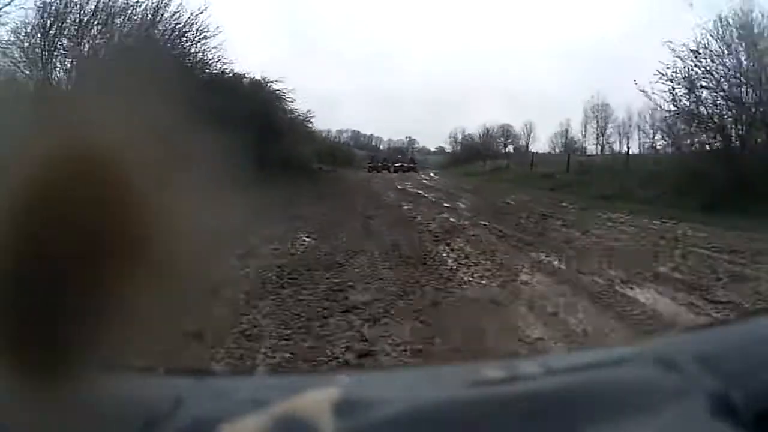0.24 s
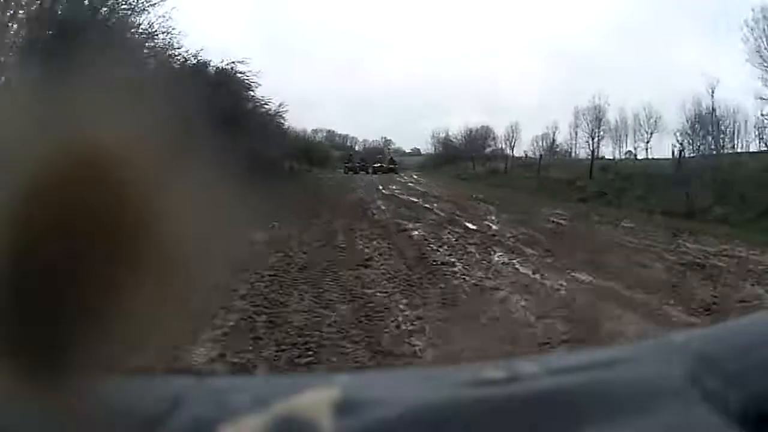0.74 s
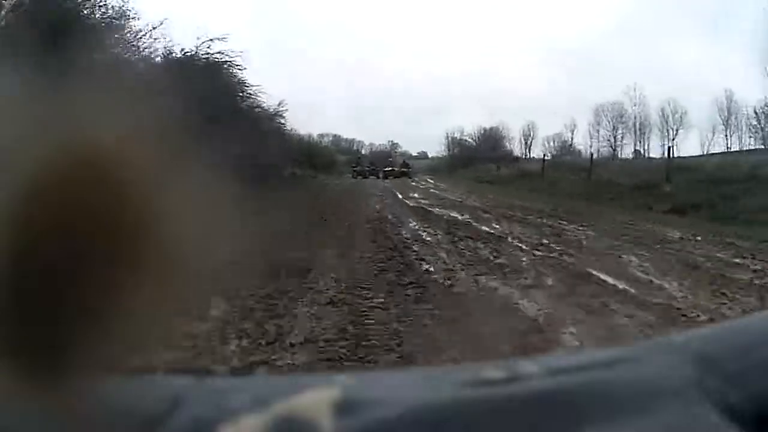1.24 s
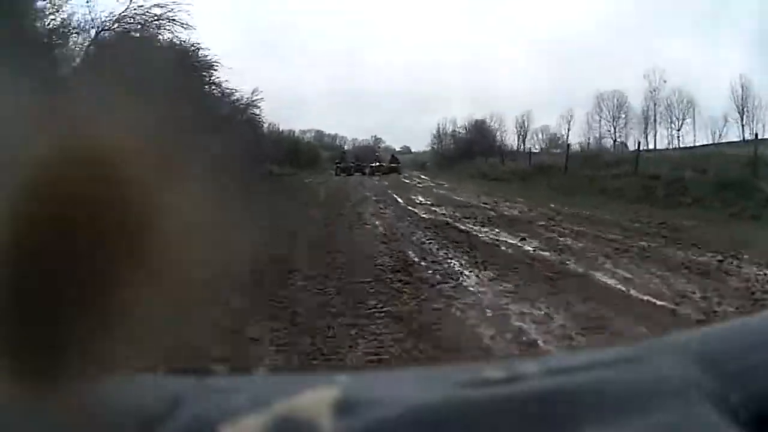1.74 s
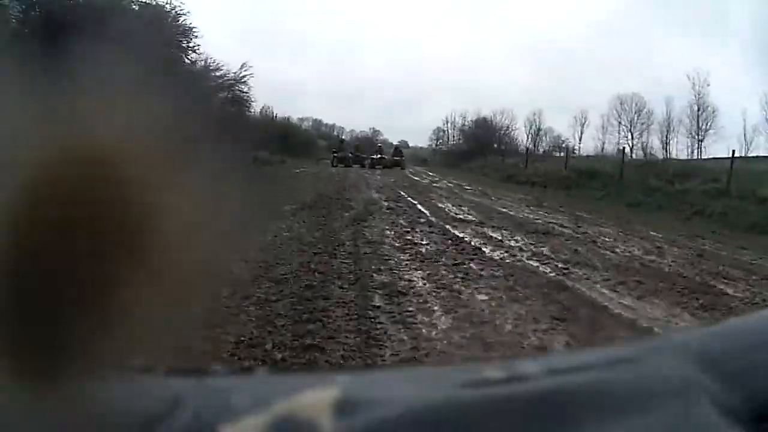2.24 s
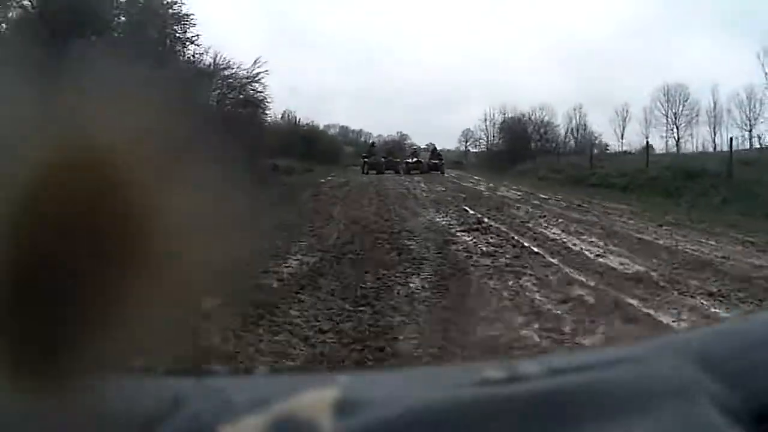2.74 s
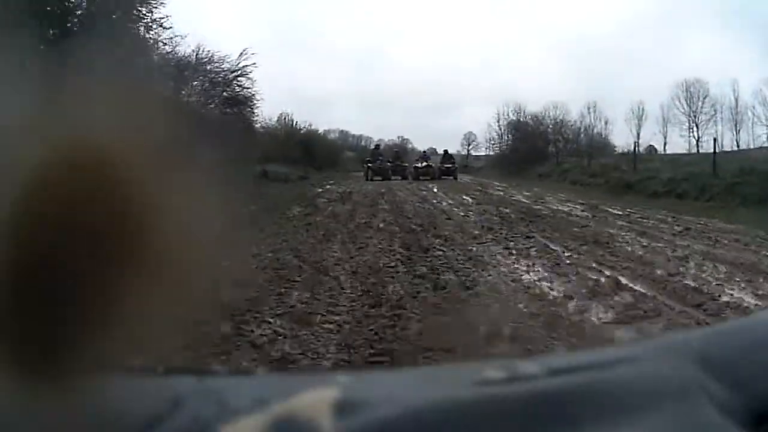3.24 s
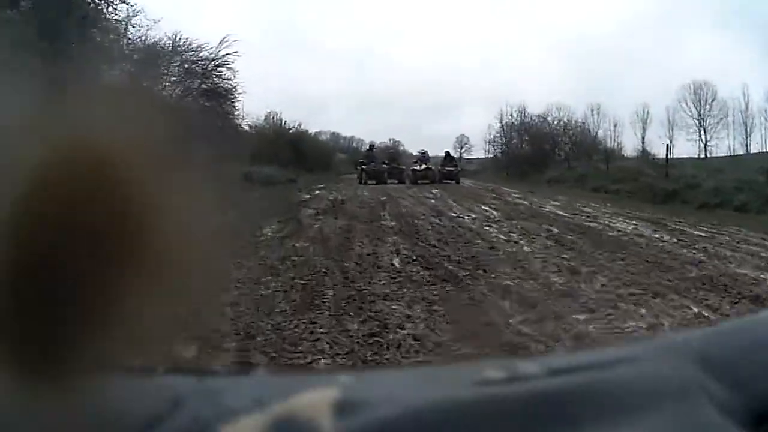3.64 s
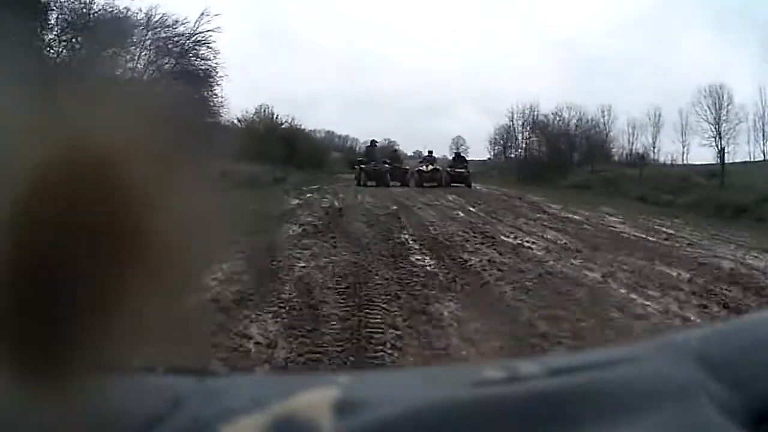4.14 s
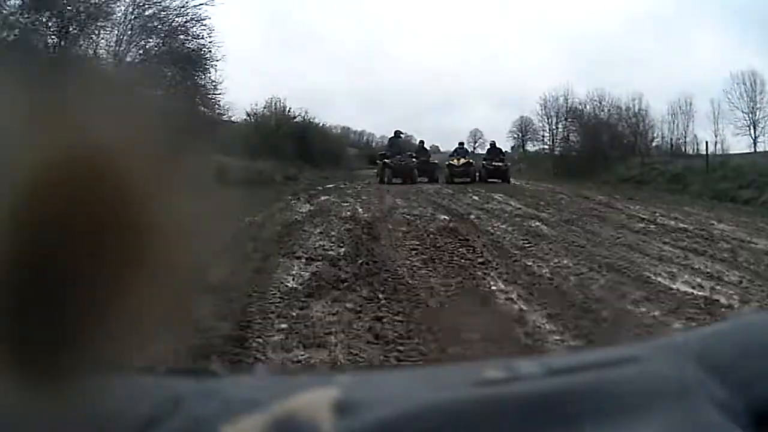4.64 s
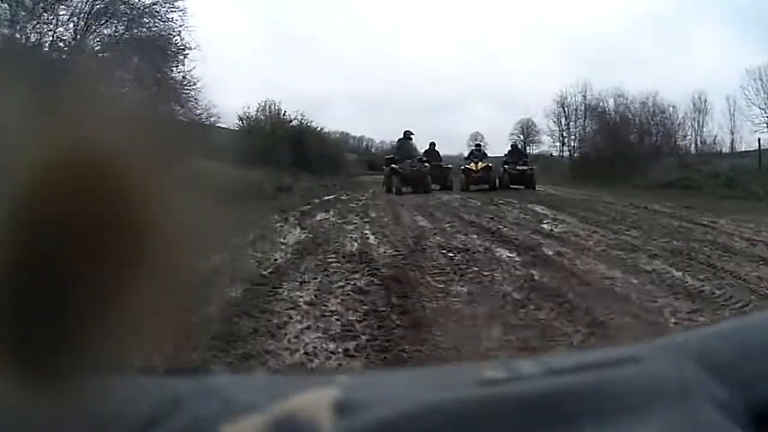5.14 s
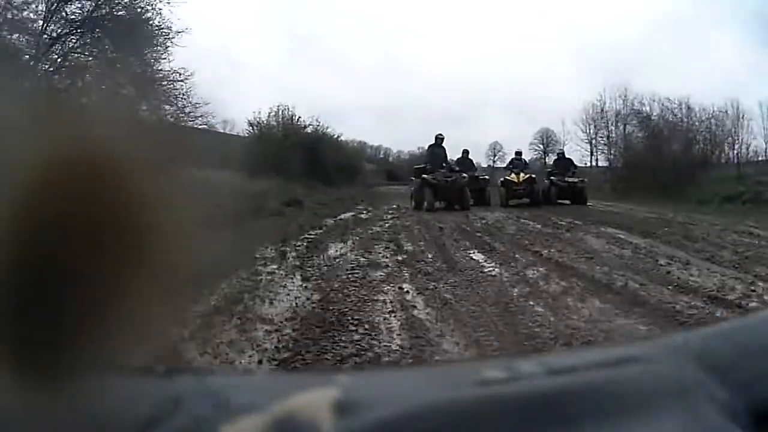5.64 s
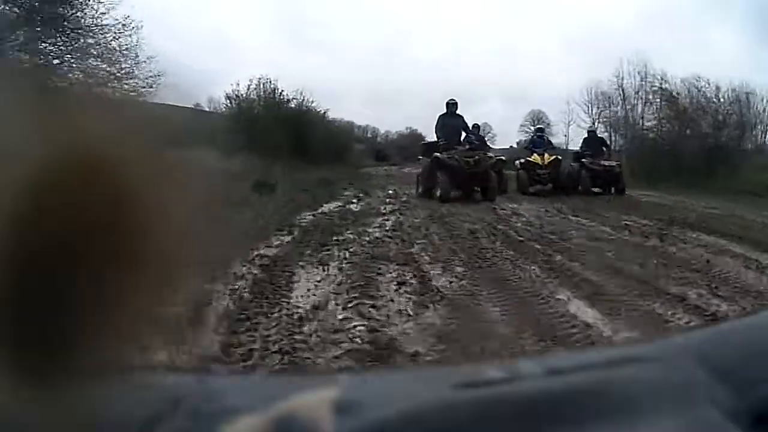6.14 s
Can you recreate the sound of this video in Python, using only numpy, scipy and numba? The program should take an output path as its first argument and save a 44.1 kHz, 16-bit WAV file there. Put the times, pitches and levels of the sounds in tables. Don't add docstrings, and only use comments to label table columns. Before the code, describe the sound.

Outdoors on a muddy track, a quad bike engine putters close by, its vibration passing through the frame to an enclosed microphone. A loose bar hums waveringly while the rack buzzes. Early throttle and dense knocks lead to a double low thud, then the engine slows and calms. Small wet spatters tick, two brief revs rise, and it settles again with a few last bumps.

```python
import sys
import numpy as np
from scipy import signal
from scipy.fft import rfft, irfft
from scipy.io import wavfile
from scipy.ndimage import uniform_filter1d
from numba import njit

SR = 44100
rng = np.random.default_rng(int(sys.argv[2]) if len(sys.argv) > 2 else 0)


def transcribe(u):
    v = np.clip(np.atleast_2d(u).T, -1, 1)
    q = np.round(v * 32767).astype(np.int16)
    wavfile.write(sys.argv[1], SR, q)


def attenuation_scalar(level_db):
    decades = np.asarray(level_db, float) / 20
    return 10 ** decades


N = 281799

# pitch in Hz, level in dB below the leading mode.
MOUNT_MODES = [(370, -3.5), (590, -7), (735, -7), (1150, -6), (1300, -14), (1450, -11.5), (1650, -12),
               (1820, -17), (2050, -20)]
# start in s, high modes in dB, low modes in dB, low pitch in Hz.
BUMPS = [(.1516, -38, -34, 710), (.203, -37, -34, 866), (.5103, -31, -27, 827), (.6403, -37.5, -29.5, 603),
         (1.1224, -28, -39, 623), (1.262, -37, -30, 820), (1.4985, -24.5, -28, 880),
         (1.6206, -27, -33, 589), (1.722, -33, -40, 870), (1.8003, -42, -31, 774),
         (1.9361, -30, -28.5, 589), (2.1226, -30, -23.5, 700), (2.2027, -30, -30, 614),
         (2.544, -42, -32, 766), (2.7797, -36.5, -52, 810), (2.8247, -28, -35, 735),
         (2.9103, -45, -33, 576), (3.048, -37, -36, 640), (3.1335, -38, -37, 616), (3.4485, -39, -35, 785),
         (3.6248, -48, -32, 724), (3.7445, -33, -34, 750), (3.8863, -42, -34.5, 830),
         (4.0212, -37, -31.5, 650), (4.2817, -36.5, -35, 720), (4.374, -39, -35.5, 620),
         (5.9507, -41, -35, 825), (6.0145, -36, -30, 735), (6.178, -33, -33, 704),
         (6.3068, -47, -38.5, 600)]


def level(x, db):
    return x * attenuation_scalar(db) / np.sqrt(np.mean(x ** 2))


def curves(table):
    s, *columns = np.transpose(table)
    return [np.interp(np.arange(N) / SR, s, c) for c in columns]


@njit
def svf(x, hz, width):
    y, band, low = np.empty(len(x)), 0., 0.
    g, damping = np.tan(np.pi * hz / SR), width / hz
    for i in range(len(x)):
        v = (band + g * (x[i] - low)) / (1 + g * (g + damping))
        band = 2 * v - band
        low += 2 * g * v
        y[i] = damping * v
    return y


def resonance(x, hz, width):
    return svf(svf(x, float(hz), float(width)), float(hz), float(width))


def ring(x, modes):
    out = np.zeros(len(x))
    for k, (hz, width, db) in enumerate(modes):
        out += (-1) ** k * level(resonance(x, hz, 1.53 * width), db)
    return level(out, 0)


def coloured(points):
    hz, db = np.transpose(points)
    log_hz = np.log(np.arange(N // 2 + 1) * SR / N + 1)
    spectrum = rfft(rng.standard_normal(N)) * attenuation_scalar(np.interp(log_hz, np.log(hz), db))
    return level(irfft(spectrum, N), 0)


def walk(rate):
    hold = int(SR / rate)
    steps = np.repeat(rng.standard_normal(N // hold + 1), hold)
    return 1.268 * uniform_filter1d(uniform_filter1d(steps, hold), hold)[:N]


def burst(start, rise, fall):
    i = int(start * SR)
    fall = max(fall, .001)
    t = np.arange(min(int(8 * fall * SR), N - i)) / SR
    return i, np.minimum(t / max(rise, .0002), 1) * np.exp(-t / fall)


def hiss():
    # pitch in Hz, level in dB per Hz.
    hiss_spectrum = [(2500, -34), (4800, -1), (6500, -2), (9000, -5), (12000, -2), (15000, -6.5),
                     (15300, -7), (15700, -19)]
    return coloured(hiss_spectrum) * attenuation_scalar(-64.5)


def orders(hz, firing_db):
    # pitch in Hz, level in dB.
    frame_response = [(37, -33), (42, -38.5), (46.5, -40), (52, -33), (60, -28), (76, -37.5), (94, -35),
                      (118, -52)]
    # start in s, end in s, change of piston shake in dB.
    slack_spans = [
        (1.95, 2.754, -5),
        (3.28, 3.72, -9.5),
    ]
    frame_hz, frame_db = np.transpose(frame_response)

    def frame(f):
        return np.interp(np.log(f), np.log(frame_hz), frame_db)

    t = np.arange(N) / SR
    slack_db = np.zeros(N)
    for start, end, db in slack_spans:
        slack_db += db * np.clip(np.minimum(t - start, end - t) / 0.09 + .5, 0, 1)
    load = firing_db + 42
    crank_db = frame(2 * hz) + 0.28 * load
    third_db = -31.5 + 0.72 * load + 0.4 * (frame(3 * hz) + 35)
    piston_db = frame(4 * hz) + slack_db
    return [firing_db, crank_db, third_db, piston_db]


def thrum(hz, cycles, order_db):
    # multiple of the firing rate, level in dB below piston shake.
    upper_orders = [(5, -16.5), (6, -10), (7, -18), (8, -16)]
    firing_db, _, _, piston_db = order_db
    order_db = list(order_db)
    for k, db in upper_orders:
        muffled_db = piston_db + db - 0.59 * np.maximum(k * hz - 120, 0)
        order_db.append(np.maximum(muffled_db, firing_db - 16))
    lag = [0.237 * k * (k - 1) for k in range(len(order_db))]
    lag[2] = lag[2] * np.tanh((firing_db + 53) / 3)
    slip, wobble_db = .06, .9
    out = np.zeros(N)
    for k, db in enumerate(order_db):
        size = attenuation_scalar(db + 0.43 + wobble_db * walk(14))
        out += size * np.cos(2 * np.pi * (k + 1) * cycles - lag[k] + slip * walk(14))
    return -np.sqrt(2) * out


def strokes(cycles, idle_db, scatter_db):
    turn = np.floor(2 * cycles).astype(int)
    scatter = scatter_db * rng.standard_normal(turn[-1] + 1)[turn]
    size = attenuation_scalar(scatter + np.minimum(idle_db - 0.5, 0) * (turn % 2))
    decay_turns = .7
    blows = level(np.diff(turn, prepend=0) * size, 0)
    return blows, size * np.exp(-(2 * cycles - turn) / decay_turns)


def shaken(cycles, firing_db, rattle_db):
    # pitch in Hz, width in Hz, level in dB.
    rack_modes = [(223, 10, -20), (292.7, 52, -4.5), (317, 22, -3.5), (336, 15, -0.5), (366, 17, -3),
                  (392, 20.3, -3.5), (426, 6.4, -14), (452, 20, -9)]
    panel_modes = [(538, 18, -21.5), (594, 69, -6.5), (653, 42, -4), (735, 57, -7.5), (805, 53, 5),
                   (827.4, 70, 0), (869, 22, -4), (924, 52, -7.5), (1033, 43, -12), (1136, 50, -14.5)]
    case_modes = [(1378, 64, -11.5), (1488, 27, -16), (1600, 25, -14), (1834, 29, -14.5), (1895, 21, -12),
                  (1926, 40, -20), (2168, 37, -19), (2867, 420, -7), (3339, 195, -10), (3863, 297, 1),
                  (4490, 170, -21), (7100, 1360, -18.5), (10300, 1900, -22.5), (14800, 900, -27)]
    # pitch in Hz, level in dB per Hz.
    rumble_spectrum = [(25, -18), (60, 1.5), (110, -0.5), (160, -9), (500, -21.5), (1200, -29.5),
                       (2500, -32), (5000, -98)]
    rack_db = -41 + 1.05 * (rattle_db + 44)
    case_db = -51 + 0.8963 * (rattle_db + 44)
    idle_db = -0.43 * (firing_db + 60.5)
    blows, gate = strokes(cycles, idle_db, scatter_db=2.5)
    chatter = [level((gate + steady) * rng.standard_normal(N), 0) for steady in (.8, .8, .7)]
    rack = ring(.9 * blows + chatter[0], rack_modes) * attenuation_scalar(rack_db - 1.5 + 1.4 * walk(9))
    panel = ring(.6 * blows + chatter[1], panel_modes) * attenuation_scalar(rattle_db - 1.05 + 0.71 * walk(12))
    case = ring(0.061 * blows + chatter[2], case_modes)
    case *= attenuation_scalar(case_db - 0.1 + 1.2 * walk(20) + 0.58 * walk(45))
    patchy_db = .8
    ground = coloured(rumble_spectrum) * attenuation_scalar(0.71 * (rattle_db + 45.0) - 41.5 + patchy_db * walk(4.92))
    return rack + panel + case + ground


def singing(cycles):
    # start in s, end in s, first pitch in Hz, last pitch in Hz, level in dB.
    bar_tones = [(0.035, 0.44, 330, 343.8, -36.5), (0.41, 0.698, 334, 322.7, -38),
                 (0.693, 1.295, 338, 327, -45), (1.306, 1.655, 327.5, 349.6, -35.5),
                 (1.662, 1.947, 373, 366, -45.5), (1.897, 2.075, 338.7, 343, -41.5),
                 (2.128, 2.405, 385, 377, -45.5), (2.378, 2.917, 375.4, 348, -41.5),
                 (2.854, 3.106, 392, 378, -45.5), (3.508, 3.896, 348, 339.6, -48.5),
                 (4.252, 4.503, 428, 426, -50.5), (4.722, 5.077, 392, 395, -48),
                 (5.079, 5.426, 422, 426, -42.5), (5.077, 5.396, 336, 342, -45),
                 (5.481, 5.915, 426, 434.6, -42.5), (5.601, 6.038, 336, 336, -44.5),
                 (6.102, 6.39, 420, 426, -44.5), (5.056, 5.497, 1353, 1396, -66),
                 (5.2, 5.945, 1912, 1900, -64)]
    out, waver, swell = np.zeros(N), walk(30), walk(16)
    throb = 3 * np.cos(2 * np.pi * cycles)
    for start, end, first_hz, last_hz, db in bar_tones:
        a, b = int(start * SR), min(int(end * SR), N)
        hz = np.linspace(first_hz, last_hz, b - a) * (1 + 0.0036 * waver[a:b])
        loudness = attenuation_scalar(db - 0.5 + 1.7 * swell[a:b] + throb[a:b]) * np.hanning(b - a) ** 0.2
        out[a:b] += np.sqrt(2) * loudness * np.sin(2 * np.pi * np.cumsum(hz) / SR)
    return out


def knocks():
    # start in s, high modes in dB, low modes in dB, low pitch in Hz.
    taps = [
        (.078, -43, -39, 740),
        (.7924, -39, -45, 740),
        (1.5454, -39, -36, 820),
        (2.3858, -38, -51, 805),
        (2.4254, -37, -46, 810),
        (2.663, -40, -38, 743),
        (3.5454, -42, -37.5, 780),
        (4.5467, -46, -42, 620),
        (4.8598, -48, -41, 692),
        (6.0893, -44, -40, 614),
    ]
    out, t = np.zeros(N), np.arange(int(.06 * SR)) / SR
    rise, tail, ring_s = .006, 1.15, .16
    bumps = BUMPS + taps
    chance = rng.standard_normal((len(bumps), len(MOUNT_MODES) + 2, 3))
    swell = np.sin(np.pi / 2 * np.minimum(t / rise, 1)) ** 2
    for (s, high_db, low_db, low_hz), own in zip(bumps, chance):
        modes = [(low_hz, low_db), (1108, high_db - 11.0)]
        modes += [(hz, db + (low_db if hz < 950 else high_db)) for hz, db in MOUNT_MODES]
        i = int((s - .004) * SR)
        for (hz, db), (detune, loud, turn) in zip(modes, own):
            shape = swell * np.exp(-(np.maximum(t - rise, 0) * hz ** .5 / ring_s) ** tail)
            tone = np.sin(2 * np.pi * hz * (1 + .03 * detune) * t + 3 * turn)
            out[i:i + len(t)] += attenuation_scalar(db + 1.2 * loud) * shape * tone
    return out


def after_rattle():
    gate = np.zeros(N)
    for s, high_db, low_db, _ in BUMPS:
        i, shape = burst(s, rise=0.0091, fall=0.037)
        gate[i:i + len(shape)] += shape * attenuation_scalar(max(high_db, low_db) - 15.5)
    loose = ring(rng.standard_normal(N), [(hz, 160, db) for hz, db in MOUNT_MODES])
    return loose * gate * attenuation_scalar(4.7 * walk(90))


def lurches():
    # start in s, peak in dB.
    thuds = [
        (0.561, -28),
        (1.681, -10.5),
        (1.75, -12),
        (2.47, -21.5),
        (2.631, -29),
        (6.262, -28),
    ]
    out, t = np.zeros(N), np.arange(int(.12 * SR)) / SR
    thud = (t / 0.017) * np.exp(1 - t / 0.0097) * np.sin(2 * np.pi * 72 * t)
    for s, db in thuds:
        i = int(s * SR)
        out[i:i + len(t)] -= attenuation_scalar(db) * thud
    return out


def mud():
    # start in s, peak in dB.
    splats = [(0.641, -24), (1.502, -24.5), (1.5755, -22.5), (2.4299, -39), (2.508, -25), (2.6626, -24.5),
              (2.9321, -25.5), (4.415, -25), (4.4617, -24), (4.543, -22), (6.1923, -33)]
    # pitch in Hz, width in Hz, level in dB.
    spatter_modes = [(2300, 1200, -9), (3040, 760, -2), (3940, 240, 8), (5600, 1600, -16)]
    spray = np.zeros(N)
    for s, db in splats:
        i, shape = burst(s - .002, rise=.003, fall=.006)
        spray[i:i + len(shape)] += shape * attenuation_scalar(db - 12.0)
    return ring(rng.standard_normal(N), spatter_modes) * spray


def squeaks():
    # start in s, peak in dB, pitch in Hz, length in s.
    slips = [(1.034, -62, 10300, .02), (1.176, -63, 9950, .02), (1.508, -53.5, 6730, 0.028),
             (1.511, -56, 10050, .04), (1.734, -67, 10300, .015), (1.856, -61, 10100, 0.022),
             (2.07, -59, 9960, .05), (2.11, -66, 10600, 0.018), (5.972, -55.5, 9860, .035),
             (6.118, -65, 10150, .04), (6.192, -59, 11000, .012)]
    # pitch ratio, level in dB.
    side_bands = [(1, 0.5), (.93, -7.5), (1.08, -7), (1.3, -11)]
    out = np.zeros(N)
    for s, db, hz, length in slips:
        i, n = int(s * SR), int(length * SR)
        for ratio, side_db in side_bands:
            whistle = level(resonance(rng.standard_normal(n), ratio * hz, 500), db - 3.0 + side_db)
            out[i:i + n] += whistle * np.hanning(n) ** 0.3
    return out


def scene():
    # time in s, firing rate in Hz.
    engine_speed = [(0, 27), (.28, 29.6), (.56, 30.2), (1.24, 28.8), (1.58, 32.8), (1.86, 31.2), (2.1, 27),
                    (2.45, 26.6), (3.3, 22.3), (3.65, 22.2), (4.45, 19.4), (4.9, 18.5), (5.15, 28.3),
                    (5.3, 28.4), (5.46, 26), (5.7, 30.8), (5.98, 25), (6.39, 24.8)]
    # time in s, firing strength in dB, shaking from throttle and ruts in dB.
    effort = [(0, -64, -39.5), (.2, -45, -38.5), (.55, -48, -37), (.9, -52, -39.5), (1.25, -54, -41),
              (1.5, -40, -35.5), (1.8, -43, -36), (2.05, -60.5, -44), (2.25, -61, -43), (2.7, -78, -42.5),
              (3.5, -69, -47.5), (3.85, -64.5, -45.5), (4.85, -64, -47), (5.18, -45, -42),
              (5.45, -55, -44.5), (5.7, -43.5, -40), (5.96, -58, -46), (6.39, -55.5, -44)]
    hz, = curves(engine_speed)
    firing_db, shake_db = curves(effort)
    unevenness = .002
    cycles = np.cumsum(hz * (1 + unevenness * walk(25))) / SR
    engine = thrum(hz, cycles, orders(hz, firing_db))
    engine += shaken(cycles, firing_db, shake_db) + singing(cycles)
    track = knocks() + after_rattle() + lurches() + mud() + squeaks()
    fade_out = np.minimum(np.arange(N, 0, -1) / (.002 * SR), 1)
    return ((engine + track) * fade_out)[None, :]


def top_cut(x):
    return signal.sosfilt(signal.butter(12, 15640, fs=SR, output="sos"), x)


def record(dry):
    offset = -.0016
    return top_cut(dry + hiss() + offset)


dry = scene()
out = record(dry)
transcribe(out)
```